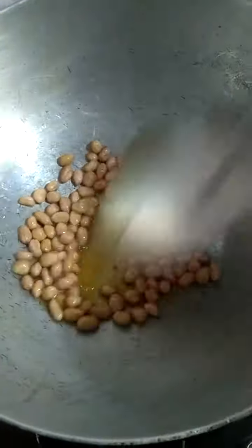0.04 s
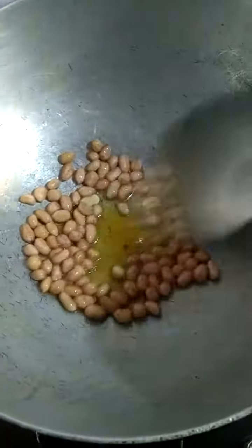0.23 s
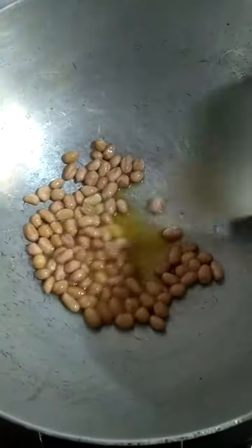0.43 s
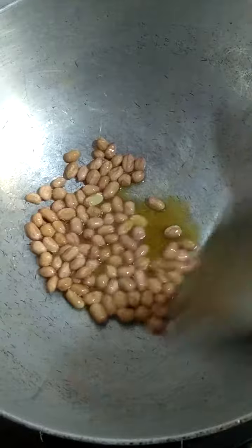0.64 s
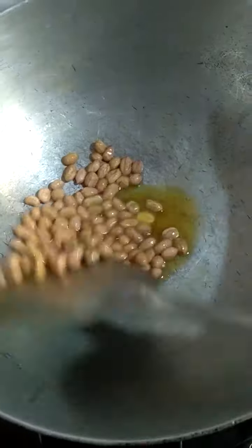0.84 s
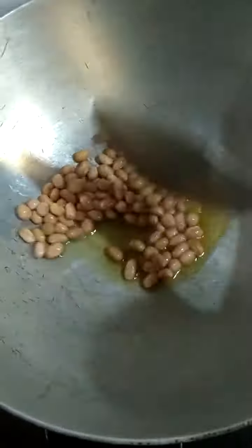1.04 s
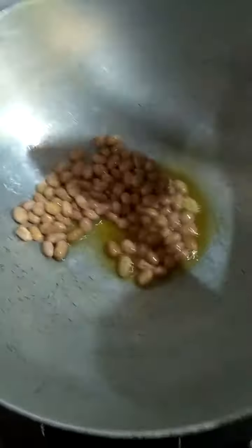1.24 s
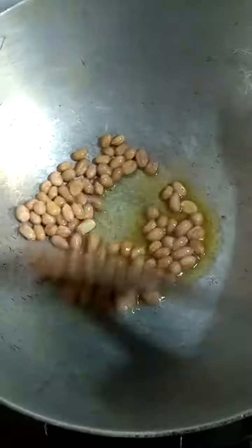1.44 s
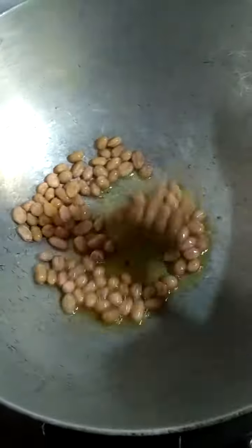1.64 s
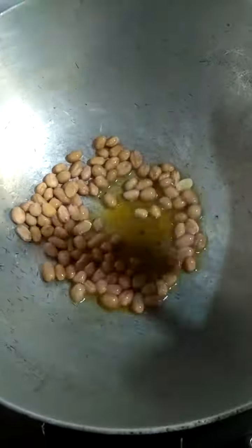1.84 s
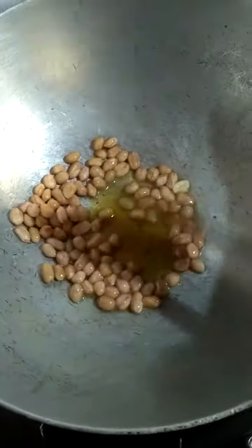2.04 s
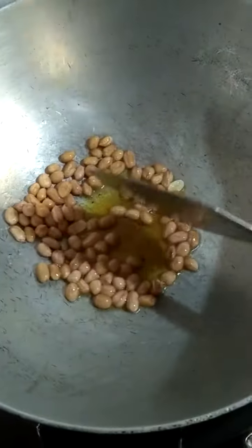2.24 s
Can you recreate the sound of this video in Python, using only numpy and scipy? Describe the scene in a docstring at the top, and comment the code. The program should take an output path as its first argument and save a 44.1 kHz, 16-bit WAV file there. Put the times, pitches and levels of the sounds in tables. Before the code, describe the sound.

Peanuts being stirred in oil in a thin metal pan: two hard spatula clanks with short scrapes and a rough squeak, then scattered nut clicks, heard close up in a small kitchen.

```python
"""Peanuts stirred in a thin metal pan

Peanuts are stirred in oil, heard from close above in a small kitchen. Noise bursts make the two
spatula strikes with their rebounds and the nut clicks; banded noise makes the scraping and rough
tones the squeaks. Contacts and scraping excite damped pan modes, and the nuts a treble room tail.
The pan rocks on the stove as low decaying modes, over a faint sizzle of shaped noise."""
import sys
import numpy as np
from scipy import signal
from scipy.fft import rfft, irfft
from scipy.io import wavfile
from scipy.ndimage import uniform_filter1d

SR = 44100
rng = np.random.default_rng(int(sys.argv[2]) if len(sys.argv) > 2 else 0)


def to_wav(s):
    """Save 16-bit WAV."""
    ch = np.atleast_2d(s).T  # columns
    pcm = np.round(np.clip(ch, -1, 1) * 32767)  # PCM
    wavfile.write(sys.argv[1], SR, pcm.astype(np.int16))


N = 101429  # length in samples

# mix levels, relative
SIZZLE_DB, DIRECT_DB, RUB_GAIN = -64, -3, 0.73
RING_DB, RUB_RING_DB, NUT_RING_DB = -9, -6, -7.5  # pan ringing after blows, scraping, nuts
BLOW_MODES_DB = 8  # extra weight of the strong modes under a blow
# contacts
RISE_MS = 0.35  # longest time constant of onset
BLOW_HZ, BODY_HZ = 4400, 600
CLICK_Q, KNOCK_Q, TICK_HZ, TICK_Q = 3.4, 1.8, 7400, 0.54
# sliding
GRAIN_MS, SCRAPE_GRAIN_DB = 2.4, 5  # grain length, level per unit of random size
PATCH_MS, PATCH_DB = 25, 5.0  # smoothing and rms wander of each narrow resonance
SQUEAK_MS, SQUEAK_ROUGH = 6, 1.1  # smoothing and rms depth of the roughness
OCTAVE_DB = -7.5  # overtone of the main squeak
# pan damping, rocking, room and microphone
LOWEST_T60_S, T60_AT_1K_S, T60_SLOPE = 0.45, 0.1, -0.14  # higher modes die sooner
DAMP_SPREAD = 1.9  # octaves by which chance may shorten a minor mode's decay
SWELL_MS = 6.0  # time constant of a thump's onset
ROOM_DB, ROOM_T60_S, ROOM_HZ = -15.5, 0.22, 7900
MIC_HZ, TOP_HZ = 52, 15700  # lower and upper band limits


def undb(db):
    """Amplitude ratio from its logarithmic level in dB."""
    return 10 ** (np.asarray(db) / 20)


def unit(x):
    """Normalise the mean power: scale to rms 1."""
    return x / np.sqrt(np.mean(x ** 2))


def peak(x):
    """Normalise the largest excursion: scale to peak 1."""
    return x / np.abs(x).max()


def band(x, hz, q):
    """Resonance of one degree of freedom: a two-pole band-pass."""
    return signal.lfilter(*signal.iirpeak(min(hz, SR / 2.3), max(q, .3), fs=SR), x)


def resonate(x, hz, q):
    """Two equal resonances in cascade, scaled to peak 1."""
    return peak(band(band(x, hz, q), hz, q))


def add(out, t, x):
    """Superposition: mix x into out from time t in seconds."""
    i = int(t * SR)
    out[i:i + len(x)] += x[:N - i]


def walk(ms):
    """Slow fluctuation: noise smoothed by two moving averages, rms 1."""
    k = int(ms * SR / 1000)
    smooth = uniform_filter1d(rng.standard_normal(N), k)
    return unit(uniform_filter1d(smooth, k))


def ring(hz, db, t60, size=12000):
    """Modal decay: damped sinusoids, one mode per row; t60 is the time to fall 60 dB."""
    t = np.arange(size) / SR
    decay = np.exp(-np.log(1000) * t / t60[:, None])
    return undb(db)[:, None] * decay * np.sin(2 * np.pi * hz[:, None] * t)


def burst(ms, noise):
    """Impact excitation: a quick contact followed by a rattle fading with time constant ms."""
    t = np.arange(len(noise)) * 1000 / SR  # ms
    force = np.sign(noise) * (.5 + np.abs(noise))
    rise = 1 - np.exp(-t / min(RISE_MS, ms))
    return force * rise * np.exp(-t / max(ms, .05))


def sizzle():
    """Broadband noise of oil and room: a faint shaped spectrum with a slowly wavering level."""
    # noise spectrum: f/Hz, relative density level/dB
    noise_spectrum = [(30, 7), (189, 3.5), (394, -13), (1630, -26), (4190, -15.5), (4780, -21),
                      (6050, -14.5), (14400, -24), (16000, -32.5)]
    f, db = np.array(noise_spectrum).T
    hz = np.arange(N // 2 + 1) * SR / N + 1  # offset avoids log(0)
    shape = undb(np.interp(np.log(hz), np.log(f), db))
    x = irfft(rfft(rng.standard_normal(N)) * shape, N)
    swell_db = walk(60)
    return unit(x) * undb(SIZZLE_DB + swell_db)


def room(x):
    """Diffuse reverberation: convolution with a bright, exponentially decaying noise tail."""
    t = np.arange(SR // 2) / SR
    tail = band(rng.standard_normal(len(t)), ROOM_HZ, .5) * np.exp(-np.log(1000) * t / ROOM_T60_S)
    tail /= np.sqrt(np.sum(tail ** 2))
    return undb(ROOM_DB) * signal.fftconvolve(x, tail)[:N]


def thumps():
    """Low-frequency modal decay: the pan rocks on the stove in modes that swell and die away."""
    # rocking modes, the low one in the first row, then two upper ones: f/Hz, t60/s
    rocking_modes = [(70.77, 0.17), (168.5, 0.15), (119, 0.087)]
    # rocking events: t/s, level/dB, relative level of the upper modes/dB
    rocking_events = [(0.258, -27.5, -9.5), (0.336, -38.5, 0.5), (.565, -27.5, -1.5), (.765, -42, -1),
                      (0.834, -37.5, -5.5), (1.036, -45, -1), (1.137, -45.5, -3), (1.297, -41.5, -1.5),
                      (1.36, -29.5, -10), (1.55, -42, -5.5), (1.681, -44, -17), (1.81, -49.5, -20),
                      (1.877, -38, -7), (2.186, -50, 1)]
    hz, t60 = np.array(rocking_modes).T
    swell = (1 - np.exp(-np.arange(12000) / (SWELL_MS * SR / 1000))) ** 2
    low, *upper = ring(hz, 0 * hz, t60) * swell
    out = np.zeros(N)
    for t, db, upper_db in rocking_events:
        add(out, t, undb(db) * (low + undb(upper_db) * sum(upper)))
    return out


def squeak():
    """Random modulation in phase and quadrature roughens tones heard while the blade slides."""
    # a gliding squeak and steadier lines, one of them a pan mode;
    # one tone per list: t/s, f/Hz, level before roughening/dB
    rough_tones = [
        [(0.471, 454, -92.5), (.555, 721, -58.5), (.62, 836, -51), (0.654, 910, -50.5), (.685, 1075, -46),
         (.73, 1073, -58), (.745, 913, -41), (.77, 910, -52.5)],
        [(.545, 1690, -35), (.62, 1710, -48), (.65, 1720, -37.5), (.672, 1800, -54)],
        [(.635, 372, -52.5), (.76, 378, -67)],
        [(.78, 1294, -57), (.85, 1302, -52.5), (.89, 1277, -68)],
        [(.79, 756, -50.5), (.9, 749, -59)],
    ]
    t, out = np.arange(N) / SR, np.zeros(N)
    tones = [np.array(rows).T for rows in rough_tones]
    s, hz, db = tones[0]
    tones.append((s, 2 * hz, db + OCTAVE_DB))
    for s, hz, db in tones:
        phase = 2 * np.pi * np.cumsum(np.interp(t, s, hz)) / SR
        tone = (1 + SQUEAK_ROUGH * walk(SQUEAK_MS)) * np.sin(phase)
        tone += SQUEAK_ROUGH * walk(SQUEAK_MS) * np.cos(phase)
        out += undb(np.interp(t, s, db, -120, -120)) * tone
    return out


def scrape():
    """Stick-slip friction: dense uneven grains of noise, with six wandering resonances per band."""
    # friction noise bands: f/Hz, Q
    friction_bands = [(800, 0.63), (2900, 0.56), (6200, 3), (10500, 0.52)]
    # strokes of blade and nuts, one list each: t/s, then relative level/dB in each friction band
    strokes = [
        [(0, -41.5, -35, -61, -42), (.1, -94.5, -81, -103, -61.5), (.14, -107, -52, -60, -93)],
        [(.25, -31, -28.5, -65, -54), (.297, -37, -30.5, -62, -30), (.34, -43.5, -30, -54, -71),
         (.37, -65, -75, -80, -75)],
        [(.56, -34, -29.5, -44.5, -35.5), (.63, -63.5, -56, -33.5, -34.5), (.7, -64, -45.5, -34.5, -38.5),
         (.725, -49.5, -36.5, -38, -35), (.774, -46, -48, -44, -40), (.796, -37.5, -48, -40, -41),
         (.885, -72, -49.5, -48, -93), (.908, -56.5, -99, -66.5, -88), (.932, -47, -51.5, -42, -91),
         (.978, -56.5, -85, -76.5, -94), (1.1, -64, -99.5, -70, -81)],
        [(1.24, -61, -61, -104, -90), (1.315, -46.5, -53, -74.5, -55), (1.354, -41.5, -58, -90.5, -55),
         (1.426, -65.5, -78.5, -74.5, -71), (1.47, -74.5, -59.5, -51, -93), (1.56, -79, -70.5, -91, -95),
         (1.62, -48, -54, -70.5, -89), (1.7, -101, -81, -57, -87)],
    ]
    t, out = np.arange(N) / SR, np.zeros(N)
    k = int(GRAIN_MS * SR / 1000)
    for b, (hz, q) in enumerate(friction_bands):
        grain_size = np.minimum(rng.exponential(size=N // k + 1), 3)
        size = np.repeat(grain_size, k)[:N]
        grains = rng.standard_normal(N) * undb(SCRAPE_GRAIN_DB * size)
        grit = np.zeros(N)
        for step in np.linspace(-1, 1, 6):
            centre, sharp = hz * 2 ** (step / q / 2), 5 * q
            patch = band(band(grains, centre, sharp), centre, sharp)
            grit += undb(PATCH_DB * walk(PATCH_MS)) * patch
        grit = unit(grit)
        for rows in map(np.array, strokes):
            out += grit * undb(np.interp(t, rows[:, 0], rows[:, b + 1], -120, -120))
    return out


def clicks():
    """Impact-excited resonance: nuts rattle at their own pitch with a treble tick; knocks are broader."""
    # nuts on pan, blade and each other: t/s, relative level/dB, f/Hz, rattle/ms, tick re click/dB
    nut_clicks = [(0.185, -38, 2030, 2.9, 4.5), (0.2796, -15.5, 6200, 2.6, 1),
                  (0.297, -14.5, 5500, 2.5, -6), (0.3286, -14, 2400, 2.8, -11),
                  (1.0261, -23, 4260, 0.97, -6.5), (1.0391, -13, 6350, 0.53, -12),
                  (1.114, -24, 6730, 1.33, -23), (1.1502, -38, 7600, 2.9, -8.5),
                  (1.1844, -44, 8390, 1.6, -15.5), (1.2218, -39, 8470, 1.2, 3),
                  (1.2548, -24, 4750, 1.15, 0.5), (1.2713, -17, 7060, 0.66, 4.5),
                  (1.281, -22.5, 5670, 4.2, -22), (1.3004, -24, 2120, 0.61, -15),
                  (1.45, -29.5, 5570, 1.74, -4), (1.512, -39, 6520, 0.97, 0.5),
                  (1.5967, -18.5, 2750, 0.95, -29), (1.623, -19, 4680, 0.87, -32),
                  (1.7157, -37.5, 7200, 2, 2.5), (1.738, -35.5, 8030, 1.1, 7.5),
                  (1.784, -16.5, 4000, 1.4, -4.5), (1.7833, -25, 2310, 1.45, -35),
                  (1.8292, -23, 5870, 1.8, -0.5), (1.833, -22, 6500, 3.4, -23),
                  (1.9617, -27, 2730, 0.73, -14), (2.0694, -34.5, 6850, 1.2, 0),
                  (2.1978, -26.5, 3600, 0.7, -3.5), (2.2038, -20, 5100, 1.06, -15),
                  (2.2528, -37, 6700, 0.94, -2)]
    # broader, duller knocks, many sounding together with a click:
    # t/s, relative level/dB, f/Hz, rattle/ms
    broad_knocks = [(.2795, -18, 2700, 14), (.2905, -20.5, 3000, 4), (.2975, -15.5, 2450, 1.4),
                    (.3245, -13, 2650, 2.6), (.338, -18, 5500, 3.5), (.7205, -23, 5550, 27),
                    (1.307, -30.5, 2013, 5), (1.317, -32, 880, 9), (1.339, -33, 2130, 24),
                    (1.606, -36, 2010, 27), (1.893, -52, 1050, 24), (1.9616, -28, 6160, 3.1),
                    (2.175, -50, 370, 23), (2.19, -39, 427, 2), (2.198, -28, 2230, 0.58)]
    out = np.zeros(N)
    for t, db, hz, ms, tick_db in nut_clicks:
        noise = rng.standard_normal(2048)
        rattle = resonate(burst(ms, noise), hz, CLICK_Q)
        tick = resonate(burst(.2, noise), TICK_HZ, TICK_Q)
        add(out, t, undb(db) * (rattle + undb(tick_db) * tick))
    for t, db, hz, ms in broad_knocks:
        knock = resonate(burst(ms, rng.standard_normal(2048)), hz, KNOCK_Q)
        add(out, t, undb(db) * knock)
    return out


def blows():
    """Steel-on-steel impact: a broadband burst with a dull low-frequency push under it."""
    # spatula blows and rebounds: t/s, relative level/dB, contact decay/ms, push re burst/dB
    spatula_blows = [(0.2257, -2.5, 9, -14.5), (0.2306, -2, 2.14, -18.5), (0.2409, -7, 7.7, -18.5),
                     (0.5341, -17.5, 0.45, -19.5), (0.5381, -2, 2.52, -25.5), (.545, -18.5, 16, -10.5)]
    out = np.zeros(N)
    push = peak(band(burst(0.16, np.ones(2048)), BODY_HZ, 0.3))
    for t, db, ms, body_db in spatula_blows:
        hit = resonate(burst(ms, rng.standard_normal(2048)), BLOW_HZ, .5)
        add(out, t, undb(db) * (hit + undb(body_db) * push))
    return out


def pan(count=700):
    """Modal superposition: strong pan modes and a crowd of unevenly damped minor ones, energy 1 in sum."""
    # strong modes: f/Hz, relative level/dB
    strong_modes = [(207, -12.5), (374, -7), (600, -13), (749, -1.5), (1096, -7.5), (1670, -13), (2065, -8),
                    (2722, -23), (2880, -15), (3425, -9), (4050, -14), (4188, -8.5), (4345, -7),
                    (5800, -15.5), (6645, -15.5), (6825, -8), (8140, -8.5), (9730, -6), (11285, -14)]
    # envelope of the minor modes: f/Hz, relative level at longest decay/dB, longest t60/s
    minor_envelope = [(300, -38, 0.2), (1291, -42.5, 0.64), (2170, -22.5, 0.13), (3150, -37, 0.23),
                      (3900, -23.5, 0.16), (4890, -43.5, 0.2), (5230, -28, 0.25), (6550, -30, 0.26),
                      (8070, -27, 0.24), (12580, -25, 0.17), (14700, -44, .2)]
    chance = rng.random((count, 3))
    hz = 300 + 15700 * (np.arange(count) + chance[:, 0]) / count
    f, db, t60 = np.array(minor_envelope).T
    shorten = 2 ** (-DAMP_SPREAD * chance[:, 1])
    level = np.interp(hz, f, db) - 20 * np.log10(shorten)  # shorter modes start louder
    sign = np.sign(chance[:, 2] - .5)
    minor = sign @ ring(hz, level, np.interp(hz, f, t60) * shorten)
    hz, db = np.array(strong_modes).T
    # all but the lowest mode are damped by oil and nuts
    t60 = np.r_[LOWEST_T60_S, T60_AT_1K_S * (hz[1:] / 1000) ** T60_SLOPE]
    strong = ring(hz, db, t60).sum(axis=0)
    return np.array([strong, minor]) / np.sqrt(np.sum((strong + minor) ** 2))


def scene():
    """Linear superposition of direct contacts, their modal ringing, room, friction, rocking and sizzle."""
    strong, minor = pan()
    steel, nuts, rub = blows(), clicks(), scrape()
    rung = undb(RING_DB) * signal.fftconvolve(steel, undb(BLOW_MODES_DB) * strong + minor)[:N]
    rung += undb(RUB_RING_DB) * signal.fftconvolve(rub, strong / 2 + minor)[:N]
    rung += undb(NUT_RING_DB) * signal.fftconvolve(nuts, minor)[:N]
    direct = undb(DIRECT_DB) * (steel + nuts) + RUB_GAIN * rub
    mix = direct + rung + room(nuts) + squeak() + thumps() + sizzle()
    return mix[None]


def record(dry):
    """Band limitation of the microphone: the deep bass is lost and the top is cut steeply."""
    dry = signal.sosfilt(signal.butter(2, MIC_HZ, "high", fs=SR, output="sos"), dry)
    return signal.sosfilt(signal.ellip(10, .2, 80, TOP_HZ, fs=SR, output="sos"), dry)


dry = scene()
out = record(dry)
to_wav(out)
```